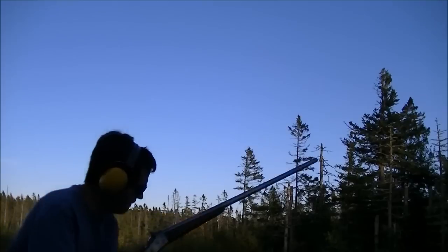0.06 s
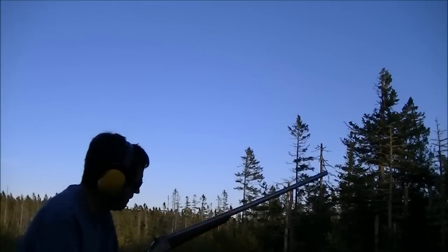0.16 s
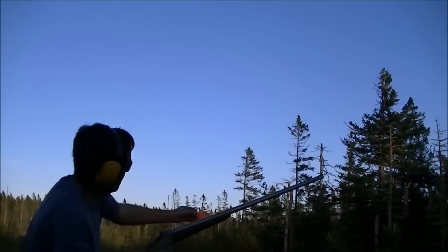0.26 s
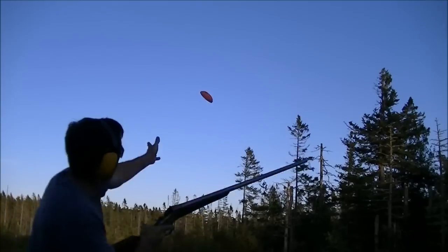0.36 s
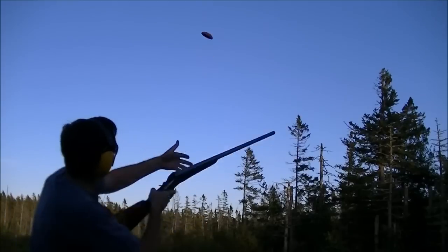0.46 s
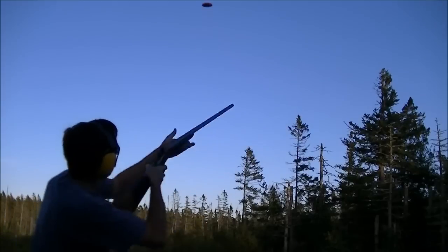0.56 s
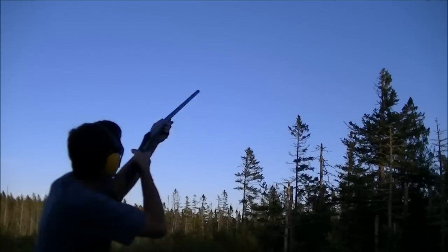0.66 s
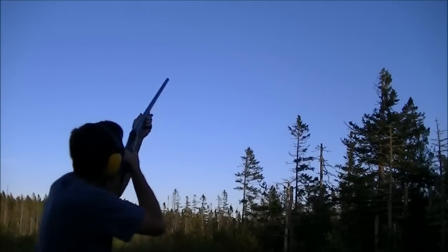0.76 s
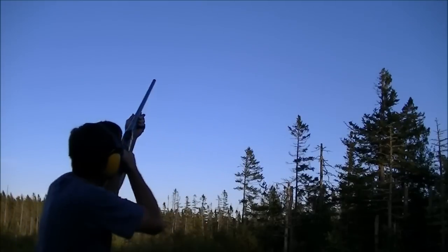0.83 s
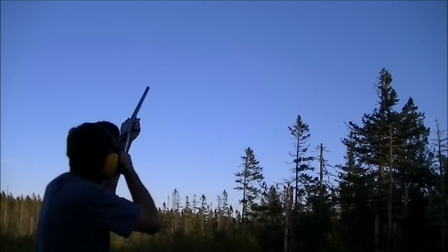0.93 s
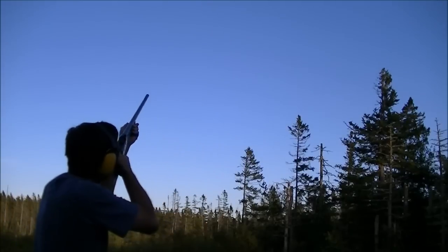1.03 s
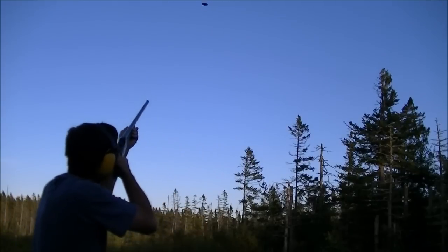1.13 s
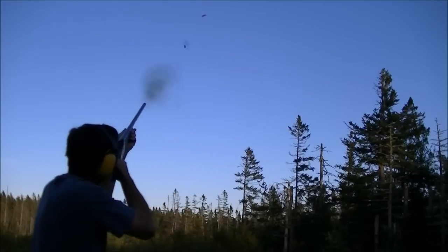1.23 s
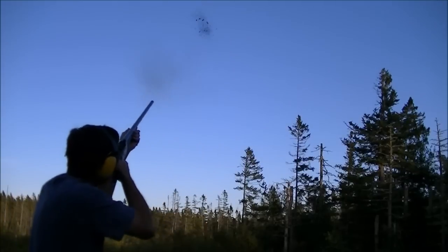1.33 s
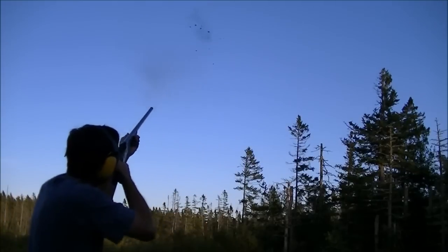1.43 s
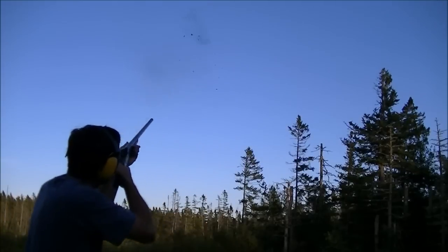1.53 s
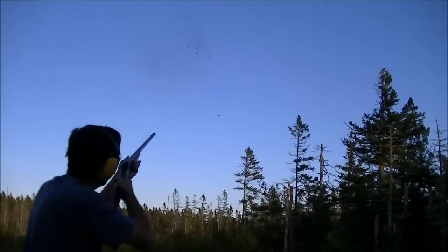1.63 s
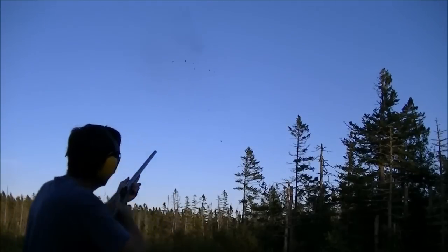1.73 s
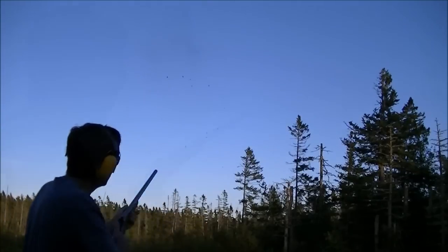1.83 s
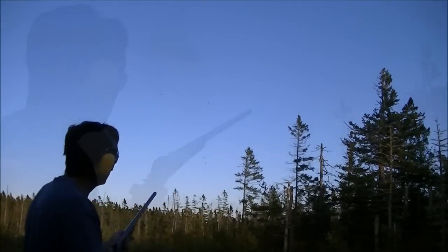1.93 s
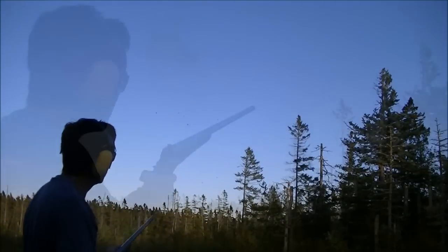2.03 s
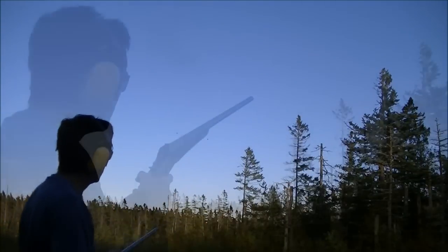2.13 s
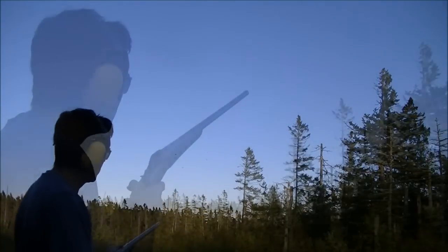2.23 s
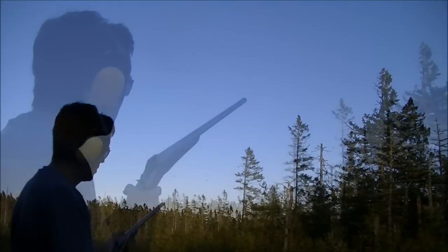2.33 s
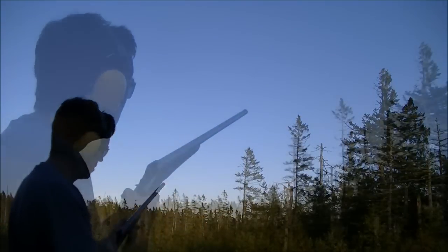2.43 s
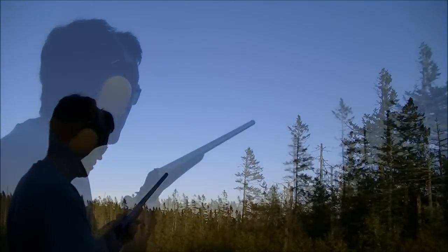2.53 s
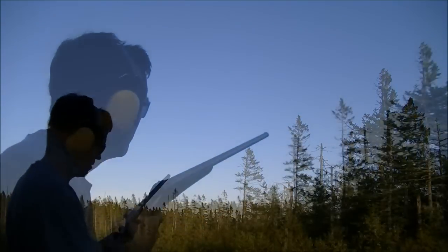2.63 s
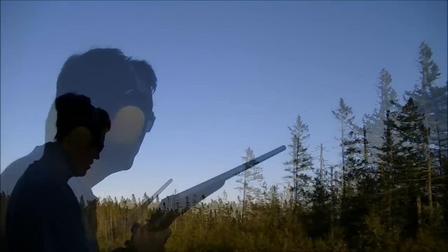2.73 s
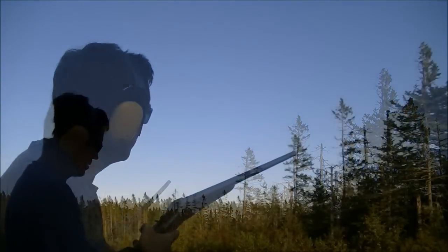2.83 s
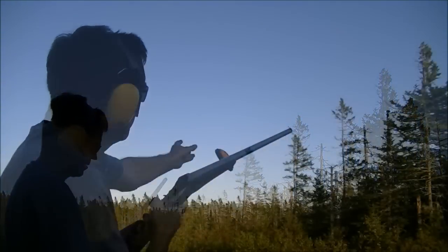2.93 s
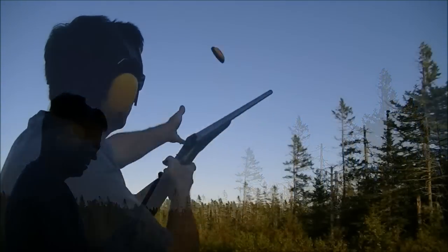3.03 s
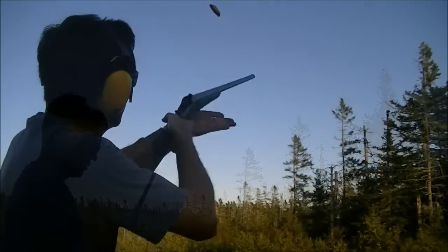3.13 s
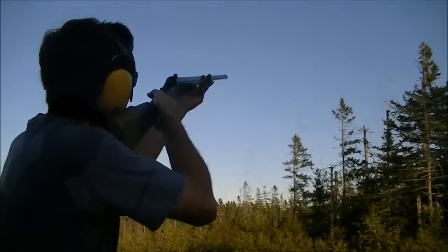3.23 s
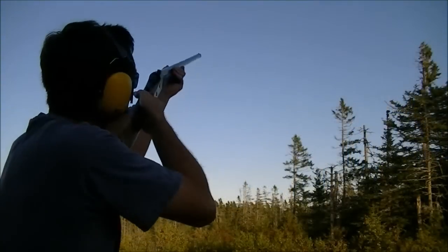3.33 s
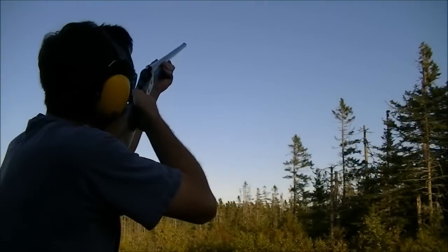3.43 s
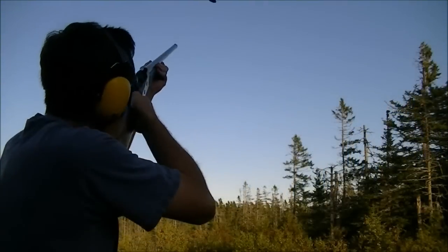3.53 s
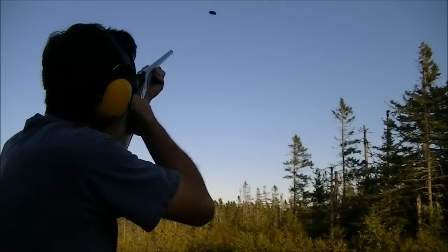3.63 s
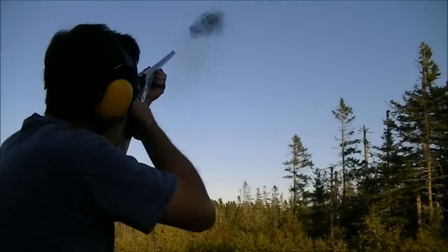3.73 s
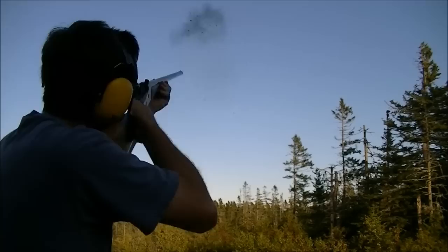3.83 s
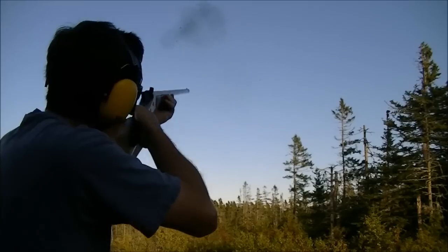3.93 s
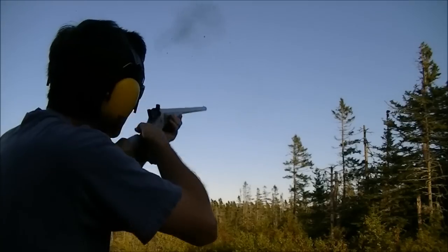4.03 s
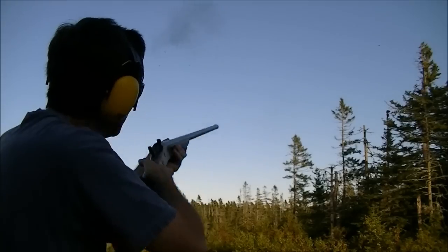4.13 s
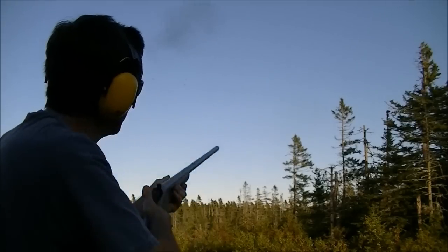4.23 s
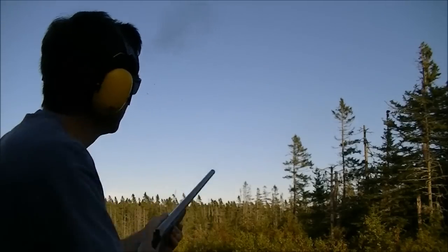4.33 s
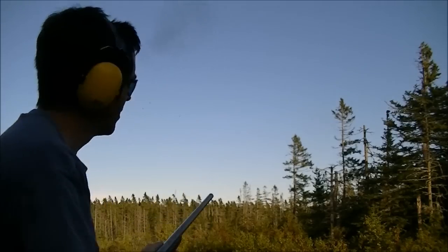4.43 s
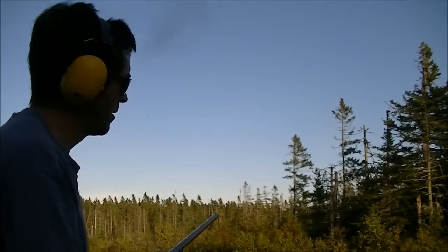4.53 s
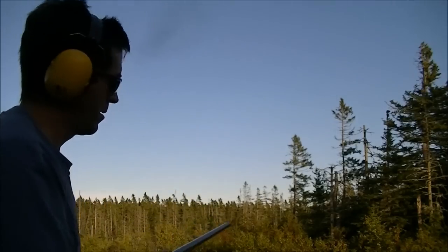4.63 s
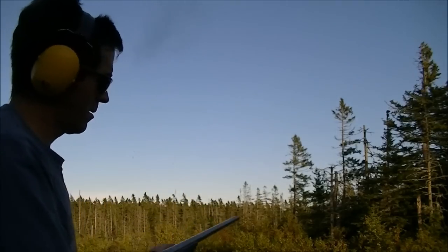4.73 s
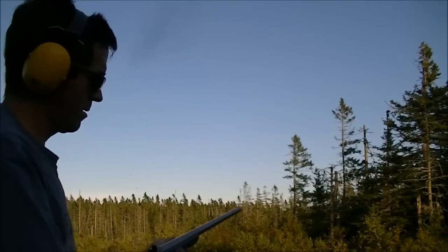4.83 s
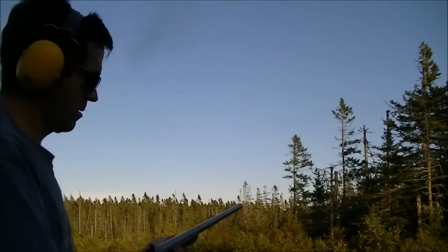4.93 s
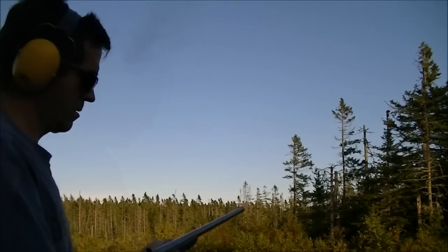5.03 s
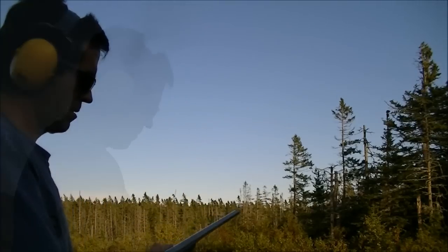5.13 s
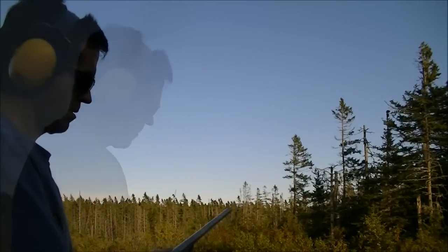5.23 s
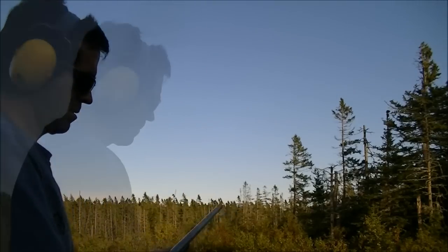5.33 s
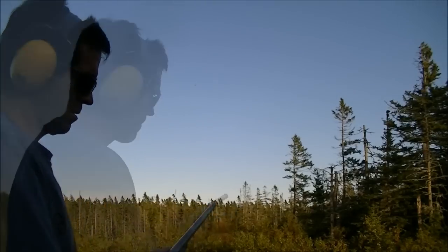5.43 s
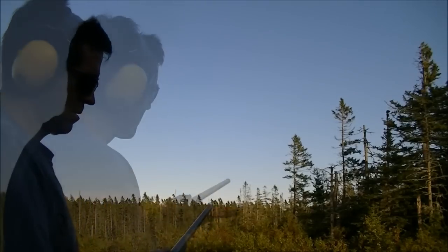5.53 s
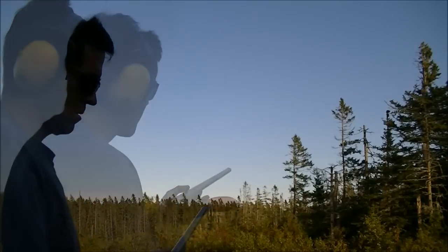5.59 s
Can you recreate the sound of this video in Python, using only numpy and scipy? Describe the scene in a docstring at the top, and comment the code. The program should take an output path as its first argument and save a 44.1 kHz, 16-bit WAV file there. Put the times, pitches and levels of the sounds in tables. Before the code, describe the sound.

Faint gun-handling clicks, then two overloaded shotgun blasts in a forest clearing, echoes rolling off trees, with sharp steel clacks between and after.

```python
"""Small clicks and rustles of a gun over soft hiss, then two shotgun shots at clay targets in a forest clearing,
a few metres from an overloaded microphone. Each blast is noise bursts that slap back from single trunks and,
as scattered reflections, from the tree line and the far forest, duller with distance.
Handling is struck steel (noise and damped modes) and soft slips. Between the shots the echoes and hiss break off
abruptly and go on over a quieter hiss."""
import sys
import numpy as np
from scipy import signal
from scipy.fft import rfft, irfft, next_fast_len
from scipy.io import wavfile

SR = 44100
rng = np.random.default_rng(int(sys.argv[2]) if len(sys.argv) > 2 else 0)


def int16_out(signal):
    """Quantize to a 16-bit WAV file."""
    q = np.round(np.clip(np.atleast_2d(signal).T, -1, 1) * 32767)
    wavfile.write(sys.argv[1], SR, q.astype(np.int16))


N = 249591
T = np.arange(N) / SR  # seconds

# the two shots: [t/s, crack level/dB, surge level/dB, surge t60/s, blast level/dB, blast t60/s,
# blast tilt/dB per octave, thump level/dB]
SHOT_EVENTS = [(1.222, -0.5, 4, 0.022, -4.5, 0.14, 0.8, -22.5), (3.6753, 1.5, 2, 0.033, 1, 0.19, 0.93, -48)]
# colour of a sharp contact, for the crack of a shot and for clicking steel: [f/Hz, level/dB]
SNAP_COLOUR = [(100, -32), (600, -18.5), (1200, 4), (3000, 0.5), (7500, -1.5), (10000, -5.5),
               (12000, -15.5), (15000, -12)]


def undb(db):
    """Decibels to gain."""
    return 10 ** (np.asarray(db) / 20)


def fade(t, t60):
    """Exponential decay, 60 dB in t60 seconds."""
    return np.exp(-np.log(1000) * t / t60)


def add(out, s, x):
    """Mix x into out from time s on."""
    i = int(s * SR)
    out[i:i + len(x)] += x[:N - i]


def colour(x, points, size=2048):
    """Minimum-phase filter through (Hz, dB) points; white noise keeps its power."""
    hz, db = np.transpose(points)
    log_f = np.log(np.fft.rfftfreq(size, 1 / SR) + 1)
    log_gain = np.log(undb(np.interp(log_f, np.log(hz), db)))
    # folding the cepstrum forward makes the response causal
    cepstrum = irfft(log_gain)[:size // 2]
    cepstrum[1:] *= 2
    response = irfft(np.exp(rfft(cepstrum, size)))[:size // 2]
    return signal.fftconvolve(x, response / np.linalg.norm(response))[:len(x)]


def dull(x, travel_s, loss_db, knee_hz, count=14):
    """Air and needles take loss_db per kHz above the knee for each second of travel."""
    size = next_fast_len(len(x) + SR // 10)
    f = np.fft.rfftfreq(size, 1 / SR)
    spectrum = rfft(x, size)
    centres = np.geomspace(knee_hz, SR / 2, count)
    out = 0
    for hz, pick in zip(centres, np.eye(count)):
        band = irfft(spectrum * np.interp(f, centres, pick), size)[:len(x)]
        khz_above_knee = (hz - knee_hz) / 1000
        out = out + band * undb(-loss_db * khz_above_knee * travel_s)
    return out


def burst(t, points, t60):
    """A decaying burst of coloured noise whose energy is the same every time."""
    envelope = fade(t, t60)
    x = colour(rng.standard_normal(len(t)) * envelope, points)
    return x * np.linalg.norm(envelope) / np.linalg.norm(x)


def splice(first, second, cut_s=0.0014):
    """The sound round the first shot gives way abruptly to that round the second."""
    break_s = 3.331
    share = np.clip((break_s - T) / cut_s, 0, 1)
    return share * first + (1 - share) * second


def hiss():
    """Smooth hiss of still evening air and the microphone; it sinks at each shot and creeps back."""
    # colour of the hiss: [f/Hz, level/dB]
    hiss_colour = [(25, -29), (55, -19.5), (80, -8.5), (120, -8), (200, -2.5), (350, -2.5), (600, 2),
                   (950, 2), (1500, -0.5), (3600, -4), (4900, -3.5), (6500, -7.5), (10000, -14.5),
                   (15500, -21)]
    # hiss round each shot: [level before/dB, level after recovery/dB, dip at the bang/dB]
    hiss_levels = [(-51, -48, 23.5), (-66.5, -65, 12.5)]
    recover_db_per_s = 21.5
    gains = []
    for (s, *_), (before_db, after_db, dip_db) in zip(SHOT_EVENTS, hiss_levels):
        dip = np.maximum(dip_db - recover_db_per_s * (T - s), 0)
        gains.append(undb(np.where(T < s, before_db, after_db - dip)))
    return colour(rng.standard_normal(N), hiss_colour, size=4096) * splice(*gains)


def swell_db(age, front_s, back_s, rise, fall):
    """Level that climbs until front_s, holds until back_s and then sinks; slopes in dB per second."""
    return -rise * np.maximum(front_s - age, 0) - fall * np.maximum(age - back_s, 0)


def scatter(age, db, points, per_s, spread_db, loss_db):
    """Thousands of small reflections of uneven size; later ones have come further and are duller."""
    arrivals = (rng.random(len(age)) < per_s / SR) * rng.standard_normal(len(age))
    # trees stand in clumps
    count = len(age) // 256
    clumps = np.interp(age, np.linspace(0, age[-1], count), rng.standard_normal(count))
    arrivals = arrivals * undb(spread_db * clumps)
    coloured = colour(arrivals / np.std(arrivals), points)
    return dull(coloured, age, loss_db, knee_hz=700) * undb(db)


def echo(shot_s, levels, bass):
    """The tree line answers with a bright crash, the forest behind with a long hollow roll over a faint rumble."""
    # colours of tree line and forest before the air has dulled them: [f/Hz, level/dB]
    tree_colour = [(40, -43), (100, -38), (200, -20.5), (500, -5), (1000, 1), (1500, -1), (2400, -3),
                   (5000, -5), (9000, -9), (15000, -19.5)]
    forest_colour = [(40, -60.5), (150, -45.5), (290, -23.5), (480, -7.5), (750, 1), (980, -0.5),
                     (1200, -6), (1600, -3.5), (2200, -7), (4000, -10.5), (8000, -17), (15000, -33.5)]
    # colour of the rumble: [f/Hz, level/dB]
    bass_colour = [(40, -24), (75, -20), (100, -6.5), (130, -8), (175, 2), (240, -0.5), (400, 1.5),
                   (900, -26)]
    # the tree line answers between two delays after the shot, with steep flanks
    tree_front_s, tree_back_s, tree_rise_db_per_s, tree_fall_db_per_s = 0.17, 0.19, 269, 123.5
    wood_fall_db_per_s = 19.5  # the wood behind the tree line dies away
    forest_delay_s = 0.9  # the far forest's level, before air loss, peaks here after the shot
    rumble_rise_db_per_s = 11

    tree_db, wood_db, far_db, rise, fall, air_db = levels
    bass_s, bass_db, bass_fall = bass
    out, age = np.zeros(N), T[:5 * SR // 2]
    trees = tree_db + swell_db(age, tree_front_s, tree_back_s, tree_rise_db_per_s, tree_fall_db_per_s)
    wood = wood_db + swell_db(age, tree_back_s, tree_back_s, tree_rise_db_per_s, wood_fall_db_per_s)
    far = far_db + swell_db(age, forest_delay_s, forest_delay_s, rise, fall)
    forest = 20 * np.log10(np.hypot(undb(wood), undb(far)))  # powers add
    low = bass_db + swell_db(age, bass_s, bass_s, rumble_rise_db_per_s, bass_fall)
    add(out, shot_s, scatter(age, trees, tree_colour, per_s=9800, spread_db=2.0, loss_db=7.5))
    add(out, shot_s, scatter(age, forest, forest_colour, per_s=7000, spread_db=0.75, loss_db=air_db))
    add(out, shot_s, scatter(age, low, bass_colour, per_s=4200, spread_db=0.3, loss_db=air_db))
    return out


def echoes():
    """Each shot rolls round the same clearing."""
    # echoes of each shot before air loss: [tree line level/dB, level of the wood behind it/dB,
    # far forest level/dB, its rise/dB per s, its fall/dB per s, treble lost/dB per kHz and s]
    echo_levels = [(-21, -31.5, -16, 34, 17.5, 5), (-16.5, -31, -37.5, 6, 20, 5)]
    # bass of each echo, which bends round the trees: [loudest t after the shot/s, level/dB, fall/dB per s]
    rumbles = [(1.1, -58.5, 2), (.25, -58.5, 14)]
    rolls = []
    for shot, levels, bass in zip(SHOT_EVENTS, echo_levels, rumbles):
        rolls.append(echo(shot[0], levels, bass))
    return splice(*rolls)


def rustles(grain_db=4.5):
    """Hands and sleeves brush the gun: soft swells of tiny slips of uneven size."""
    # brushes: [middle t/s, length/s, level/dB, centre f/Hz]
    brushes = [(0.132, .06, -49, 1700), (.26, 0.24, -59, 7040), (.43, .06, -55, 12000),
               (2.452, .26, -54, 12900), (2.684, .014, -51, 6240), (2.916, 0.14, -75, 12000),
               (4.254, .008, -62, 7550), (4.348, .01, -58, 8000)]
    out = np.zeros(N)
    for s, length, db, hz in brushes:
        swell = np.hanning(int(length * SR))
        sizes = undb(grain_db * rng.standard_normal(len(swell)))
        slips = rng.standard_normal(len(swell)) * sizes
        brush_colour = [(hz / 4, -30), (hz, 0), (hz * 2, -14)]
        add(out, s - length / 2, undb(db) * swell * colour(slips / np.std(slips), brush_colour))
    return out


def ring(t, modes):
    """Damped modes, struck a little differently each time."""
    out = 0
    for hz, db, t60 in modes:
        strike = rng.choice([-1, 1]) * undb(db + rng.standard_normal())
        out = out + strike * np.cos(2 * np.pi * hz * t) * fade(t, t60)
    return out


def action(narrow_db=4.0):
    """Steel snaps against steel, loose parts rattle, and the struck part rings briefly."""
    # clicks: [t/s, snap level/dB, rattle level/dB, rattle t60/s, f the contact favours/Hz,
    # part that rings, ring level/dB]
    clicks = [(0.135, -33, -47, .008, 12000, "hinge", -55), (.2300, -44, -46, .02, 5000, "hinge", -55),
              (0.267, -54, -47, 0.11, 7000, "ejector", -54), (0.3, -46, -42.5, 0.03, 1600, "hinge", -55),
              (0.5347, -55, -42, 0.034, 1000, "hinge", -65), (0.6996, -42, -40, 0.032, 3940, "lock", -60),
              (2.5353, -18, -20, 0.062, 2600, "hinge", -20.5),
              (2.6109, -25, -20.5, 0.031, 4030, "ejector", -23.5),
              (3.1567, -24, -24.5, 0.03, 5030, "ejector", -31),
              (3.2060, -5.5, -25.5, 0.06, 8000, "lock", -26), (4.3228, -29, -40, 0.016, 1490, "hinge", -62),
              (4.7241, -24.5, -33.5, 0.031, 3500, "hinge", -36),
              (4.8387, -45, -34, 0.033, 4400, "ejector", -42.5),
              (5.3448, -45.5, -50, .015, 6080, "lock", -73), (5.3571, -27, -35, 0.03, 5100, "lock", -36)]
    # modes of each steel part, with mean levels: [f/Hz, level/dB, t60/s]
    parts = {"hinge": [(1362, 2.5, 0.046), (1494, -11, .07), (1900, 5, 0.043), (2910, 4.5, 0.022),
             (5540, -17, .04), (5830, 5.5, 0.017), (6940, -7.5, .05), (8050, -2, 0.022)],
             "ejector": [(1492, 4.5, 0.04), (2084, 1, 0.037), (2940, 0, 0.047), (4460, -2, 0.048),
             (4850, -5.5, 0.029), (5860, 11, 0.016), (6840, 1, 0.025), (7440, -19.5, .04)],
             "lock": [(1057, 0, 0.066), (1376, 3.5, 0.021), (2700, 2, 0.04), (4430, 2.5, 0.02),
             (5430, 0, 0.023), (7300, -7, 0.029), (8760, 4, 0.022), (9920, 1.5, .06), (10050, 5, 0.034),
             (10700, -5, .05)]}
    out, t = np.zeros(N), T[:SR // 5]
    for s, snap_db, rattle_db, t60, bright_hz, part, ring_db in clicks:
        # a harder contact moves the energy up the spectrum
        contact = [(hz, db - narrow_db * np.log2(hz / bright_hz) ** 2) for hz, db in SNAP_COLOUR]
        snap = undb(snap_db) * burst(t, contact, 0.007)
        rattle = undb(rattle_db) * (burst(t, contact, t60) + undb(-20) * burst(t, contact, 0.12))
        add(out, s, snap + rattle + undb(ring_db) * ring(t, parts[part]))
    return out


def slaps():
    """Single trunks send back short copies of the bang."""
    # slaps: [t/s, level/dB, t60/s]
    trunk_slaps = [(1.2780, -17, 0.0092), (1.37, -10, 0.0089), (1.4095, -21, 0.01), (1.4450, -18.5, 0.021),
                   (1.469, -20, 0.018), (3.7165, 1, 0.0043), (3.8116, -1.5, 0.0076), (3.8620, -15, .02),
                   (3.9139, -12, 0.019), (3.9260, -16.5, 0.012)]
    # colour of a slap: [f/Hz, level/dB]
    slap_colour = [(60, -41.5), (250, -13.5), (700, -6), (1300, 2), (3000, -5), (6000, -13.5), (10000, -26),
                   (15000, -33.5)]
    out, t = np.zeros(N), T[:SR // 16]
    for s, db, t60 in trunk_slaps:
        add(out, s, undb(db) * burst(t, slap_colour, t60))
    return out


def blasts(gap_s=0.0059, thump_hz=38):
    """A short crack, then an overloading surge and the blast scattered by ground and brush, over a low thump."""
    # colour of the blast before each shot's tilt: [f/Hz, level/dB]
    blast_colour = [(30, -29.5), (110, -23), (190, -15), (380, -11), (650, -3), (1300, -1), (2800, -4),
                    (5500, -10), (9000, -13.5), (15000, -19.5)]
    # colour of the surge: [f/Hz, level/dB]
    surge_colour = [(200, -25.5), (1200, -7.5), (2500, 0), (5500, -2), (9000, -14.5), (15000, -26.5)]
    out, t = np.zeros(N), T[:SR // 2]
    swell = np.minimum(t / 0.0018, 1) ** 2  # onset of the crack
    for s, crack_db, surge_db, surge_t60, db, t60, tilt_db, thump_db in SHOT_EVENTS:
        tilted = [(hz, level + tilt_db * np.log2(hz / 1300)) for hz, level in blast_colour]
        # the brush close by keeps sizzling
        scattered = burst(t, tilted, t60) + undb(-28) * burst(t, tilted, 0.32)
        add(out, s, undb(crack_db) * swell * burst(t, SNAP_COLOUR, 0.010))
        add(out, s + gap_s, undb(surge_db) * burst(t, surge_colour, surge_t60))
        add(out, s + gap_s, undb(db) * dull(scattered, t, loss_db=5.5, knee_hz=1500))
        add(out, s, undb(thump_db) * np.sin(2 * np.pi * thump_hz * t) * fade(t, 0.039))
    return out


def scene():
    """Hiss, echoes, handling of the gun and the shots, on one channel."""
    return (hiss() + echoes() + rustles() + action() + slaps() + blasts())[None]


def record(dry):
    """The microphone overloads on the blasts, bending peaks smoothly to a ceiling; the top is cut."""
    ceiling, top_hz = 0.92, 15800
    clipped = dry / (1 + (dry / ceiling) ** 4) ** (1 / 4)
    low_pass = signal.ellip(10, 0.1, 85, top_hz, fs=SR, output="sos")
    return signal.sosfilt(low_pass, clipped)


dry = scene()
out = record(dry)
int16_out(out)
```